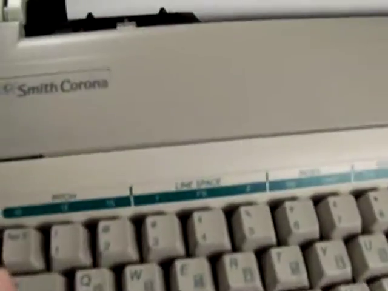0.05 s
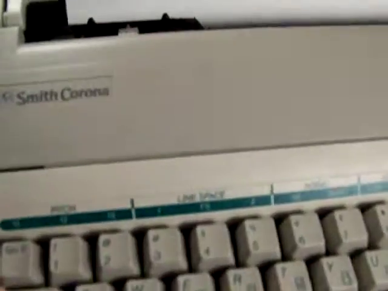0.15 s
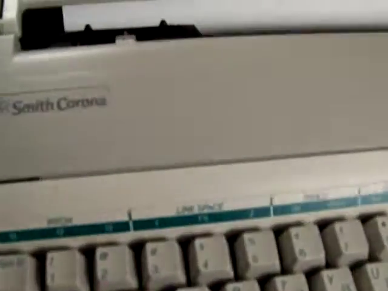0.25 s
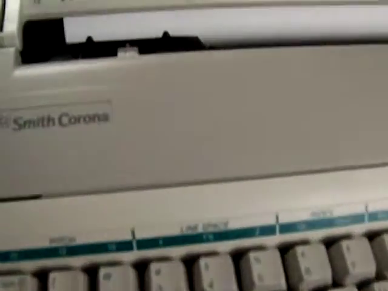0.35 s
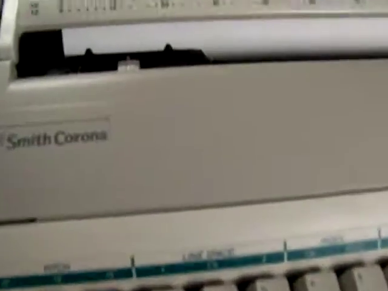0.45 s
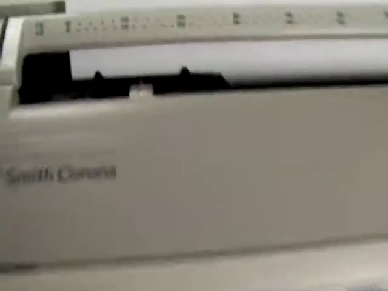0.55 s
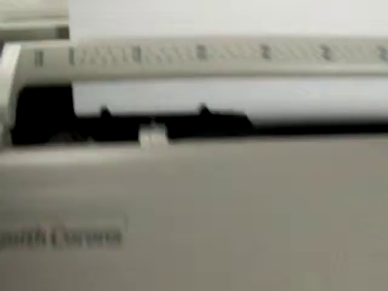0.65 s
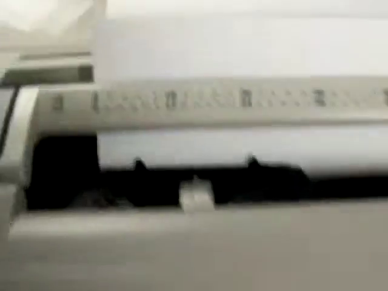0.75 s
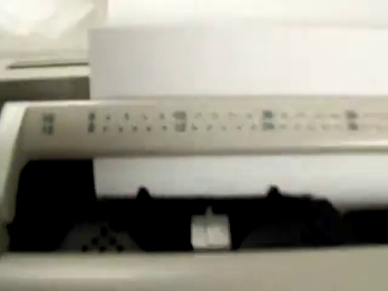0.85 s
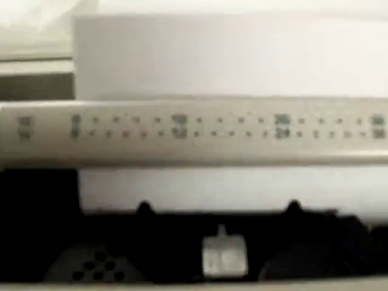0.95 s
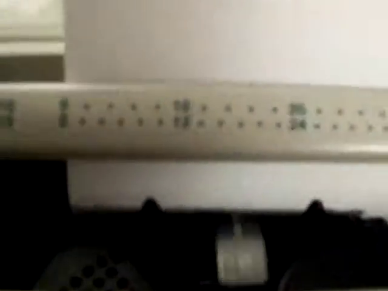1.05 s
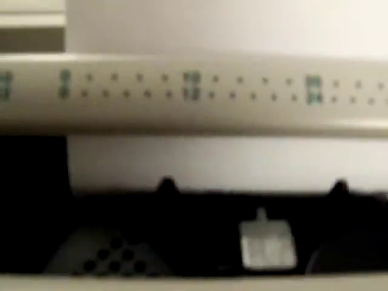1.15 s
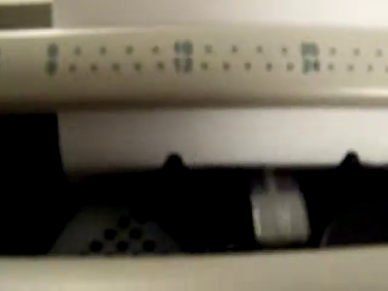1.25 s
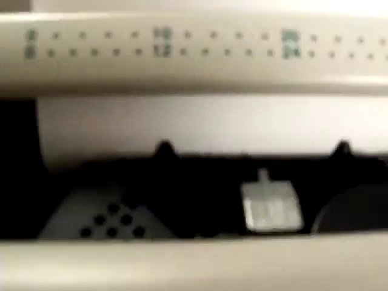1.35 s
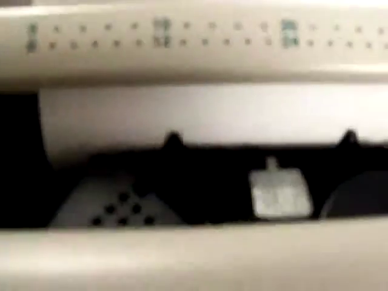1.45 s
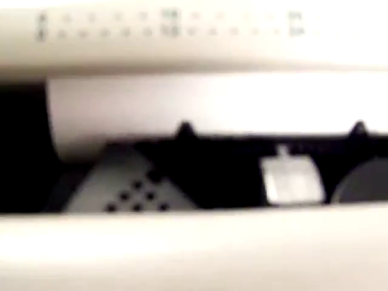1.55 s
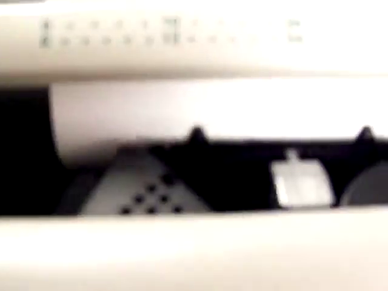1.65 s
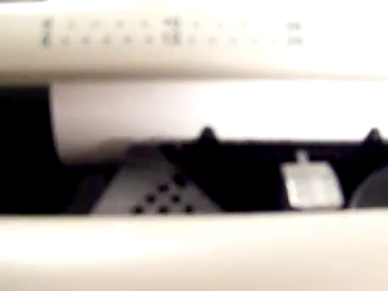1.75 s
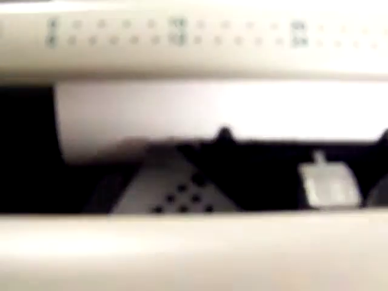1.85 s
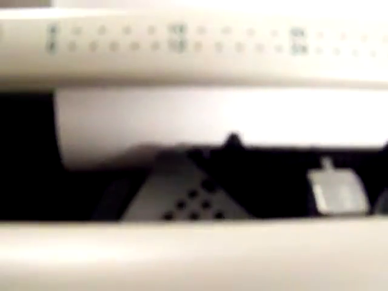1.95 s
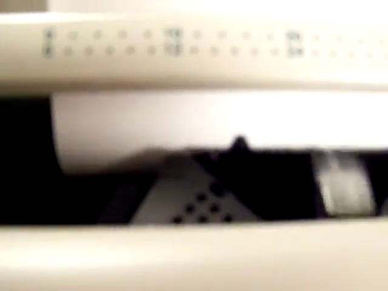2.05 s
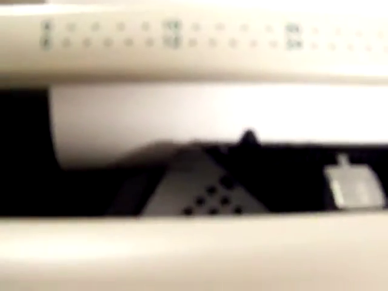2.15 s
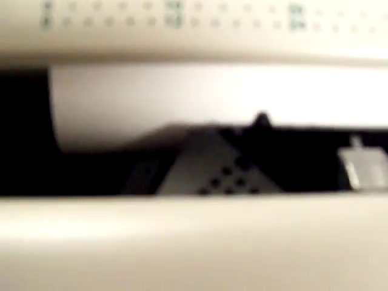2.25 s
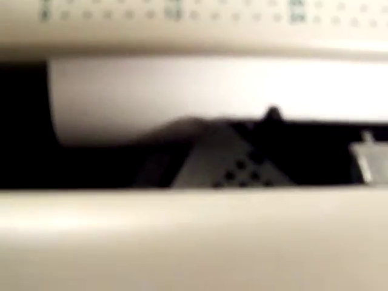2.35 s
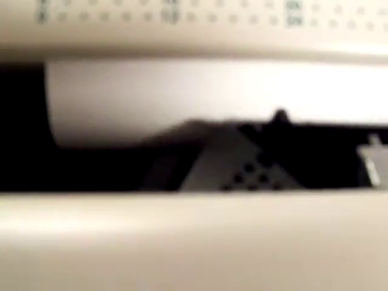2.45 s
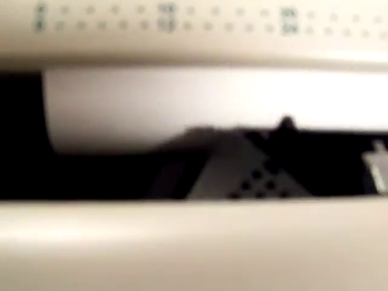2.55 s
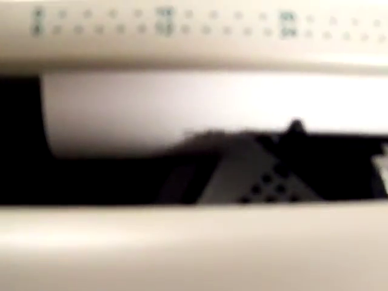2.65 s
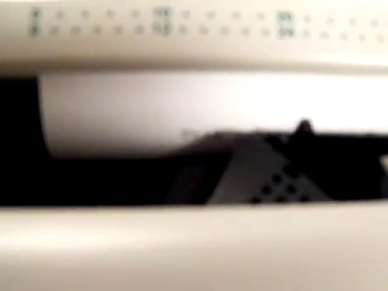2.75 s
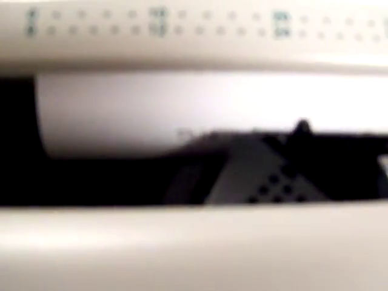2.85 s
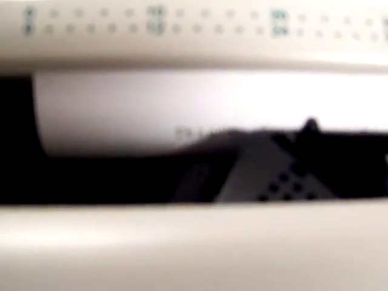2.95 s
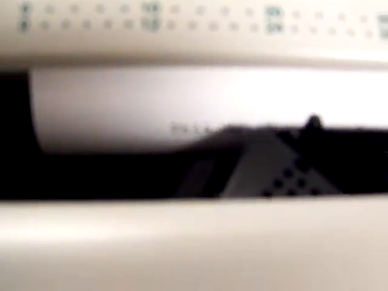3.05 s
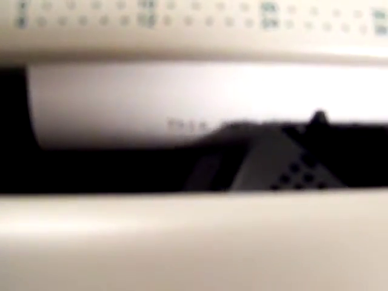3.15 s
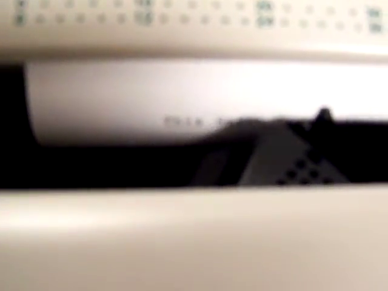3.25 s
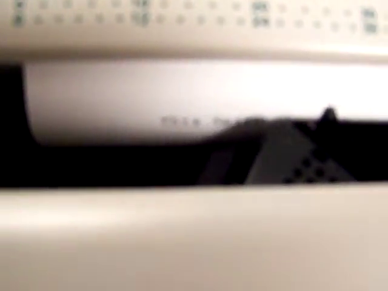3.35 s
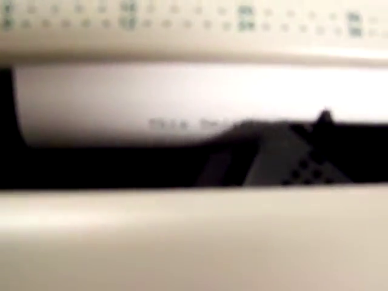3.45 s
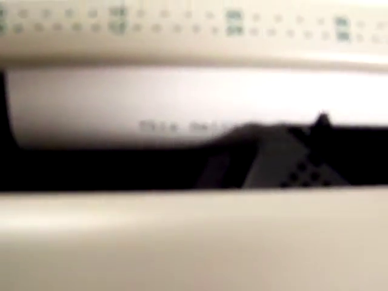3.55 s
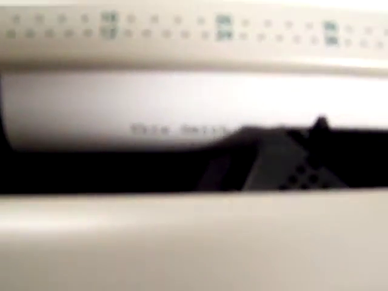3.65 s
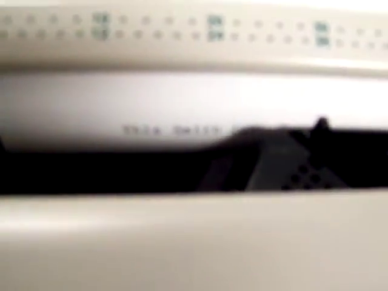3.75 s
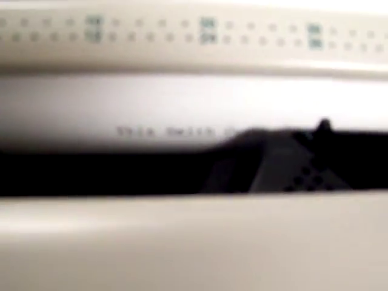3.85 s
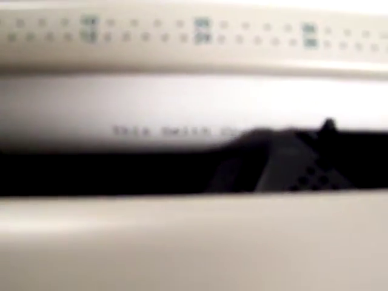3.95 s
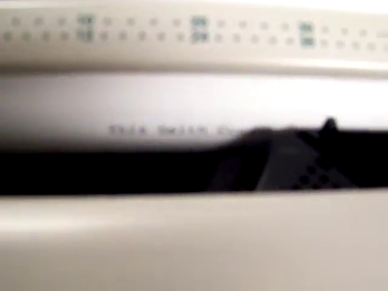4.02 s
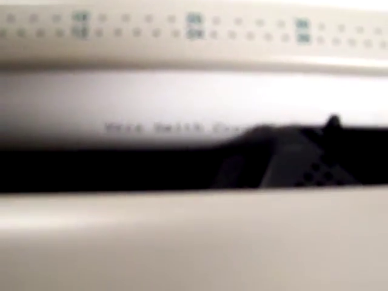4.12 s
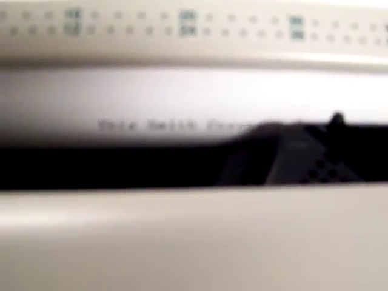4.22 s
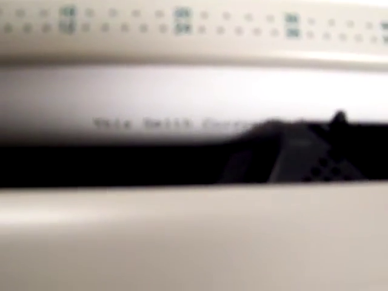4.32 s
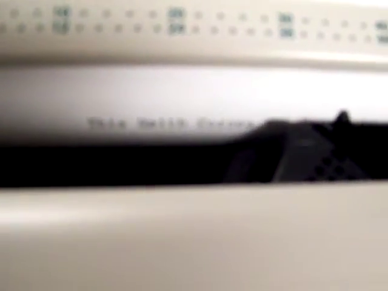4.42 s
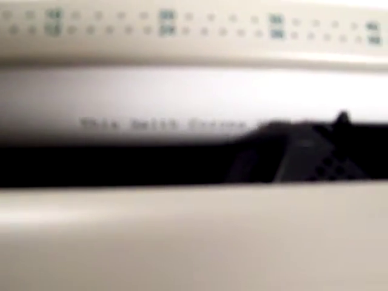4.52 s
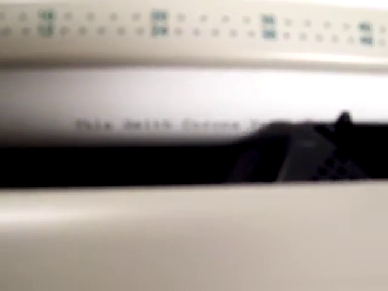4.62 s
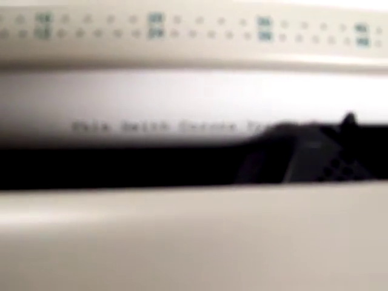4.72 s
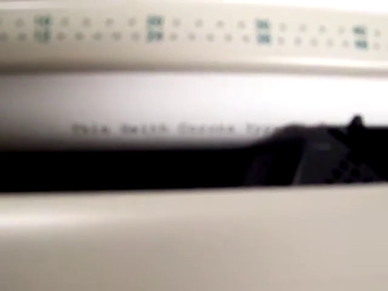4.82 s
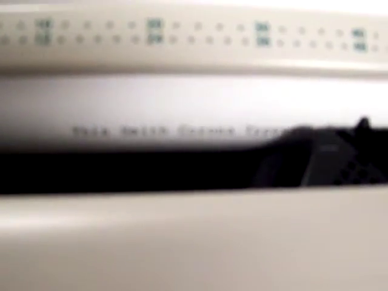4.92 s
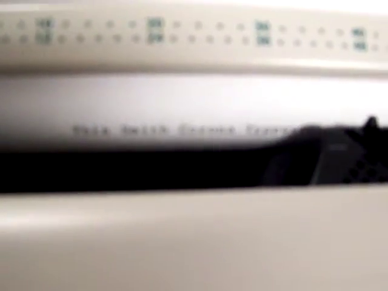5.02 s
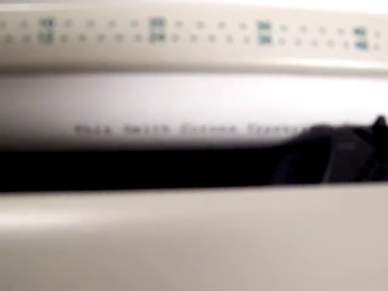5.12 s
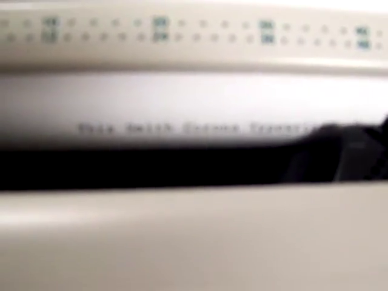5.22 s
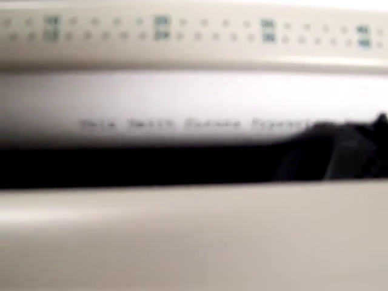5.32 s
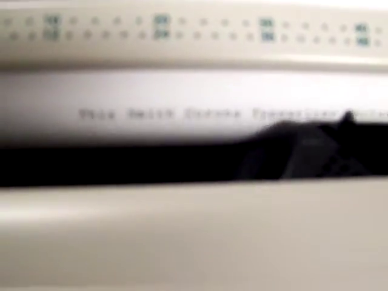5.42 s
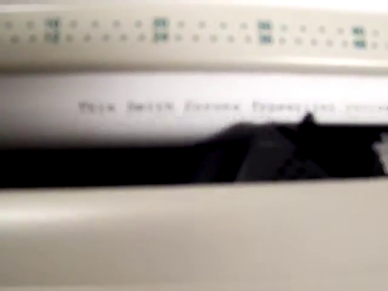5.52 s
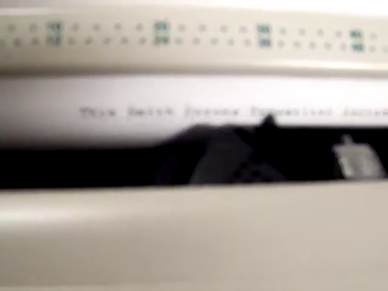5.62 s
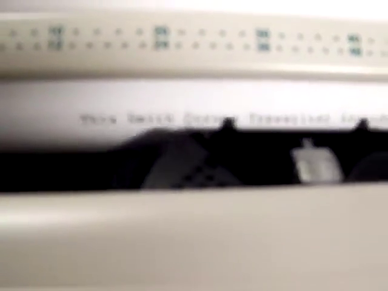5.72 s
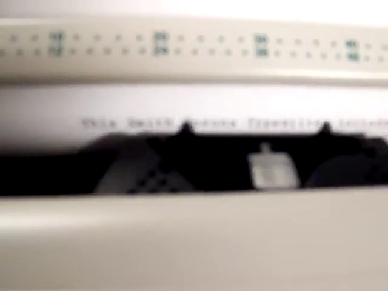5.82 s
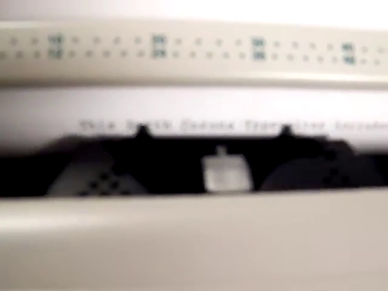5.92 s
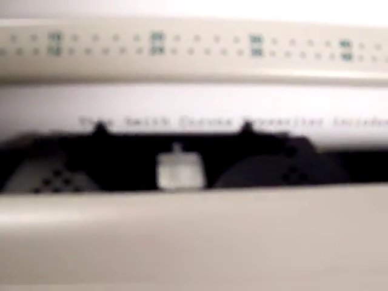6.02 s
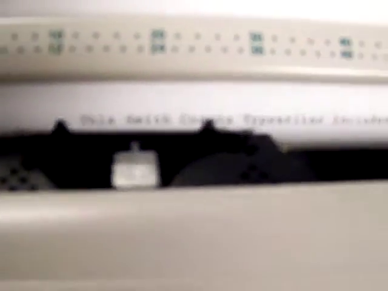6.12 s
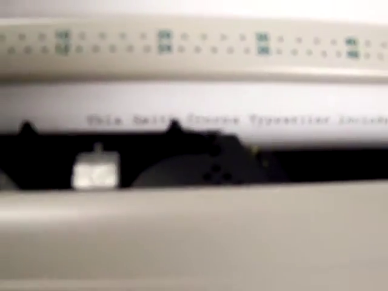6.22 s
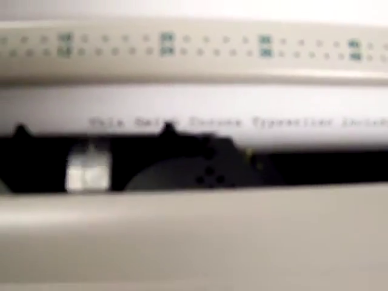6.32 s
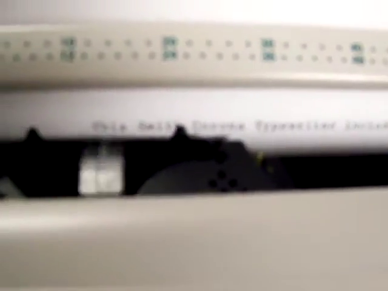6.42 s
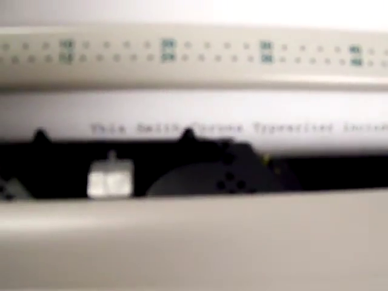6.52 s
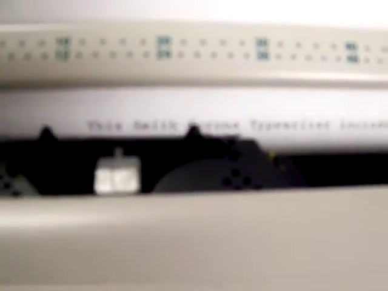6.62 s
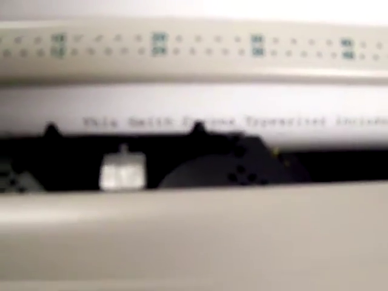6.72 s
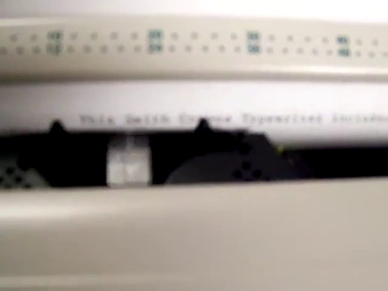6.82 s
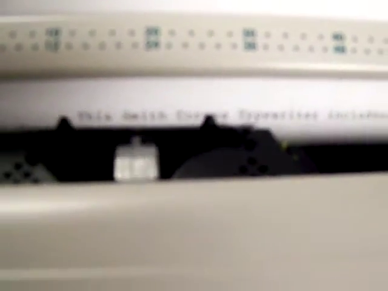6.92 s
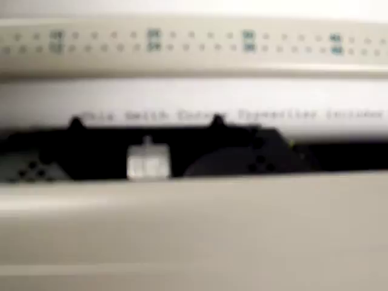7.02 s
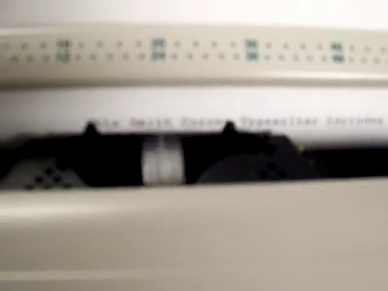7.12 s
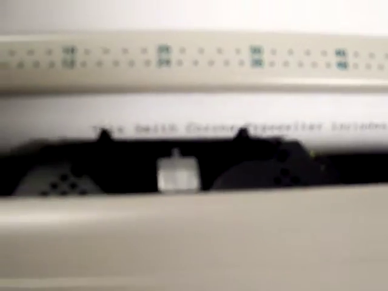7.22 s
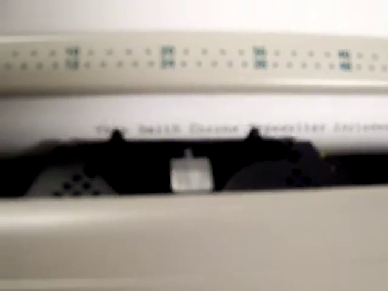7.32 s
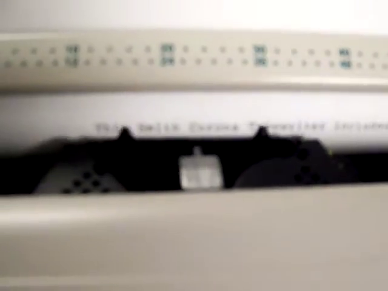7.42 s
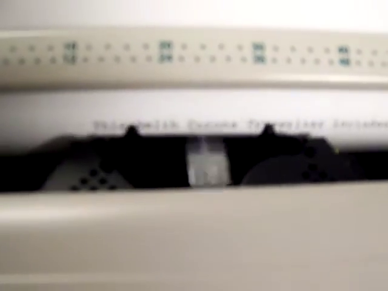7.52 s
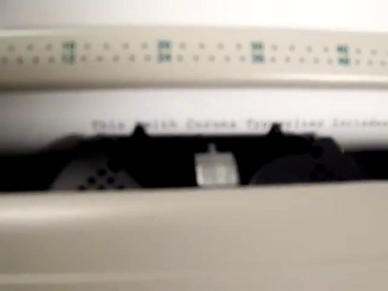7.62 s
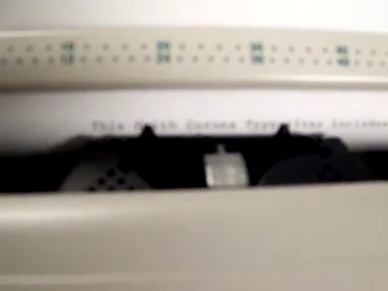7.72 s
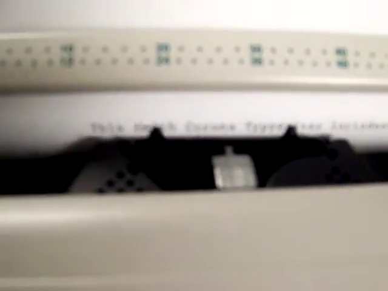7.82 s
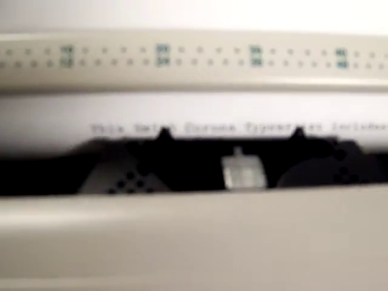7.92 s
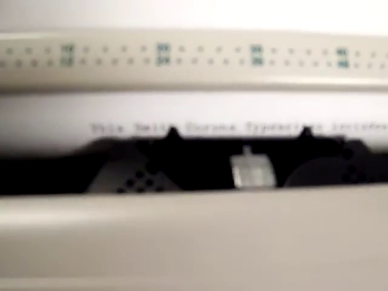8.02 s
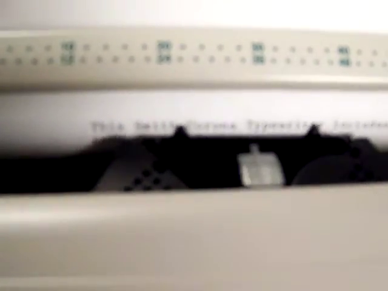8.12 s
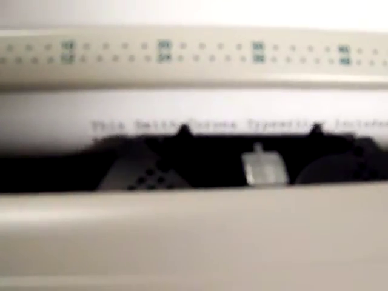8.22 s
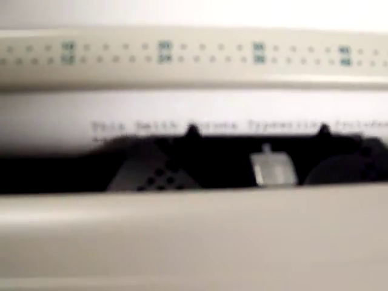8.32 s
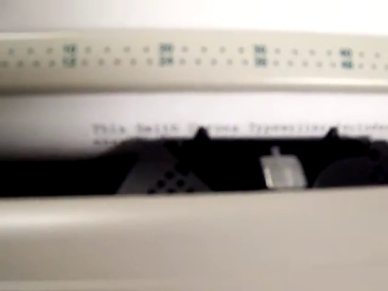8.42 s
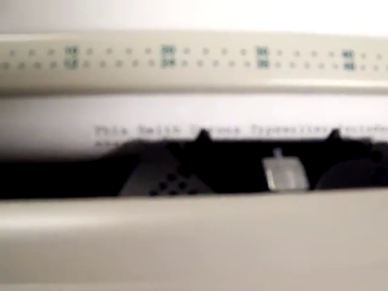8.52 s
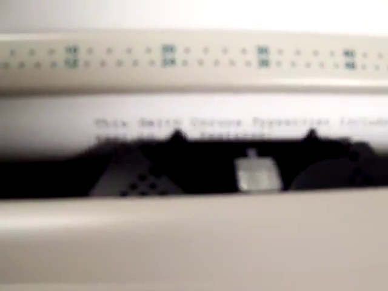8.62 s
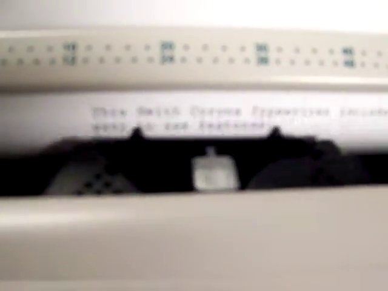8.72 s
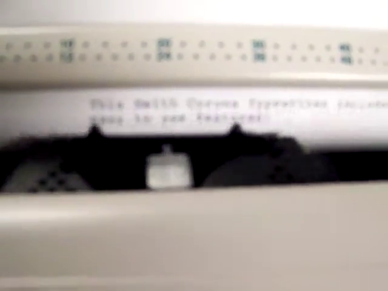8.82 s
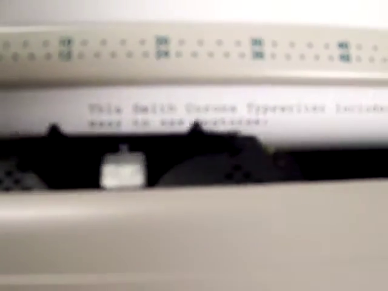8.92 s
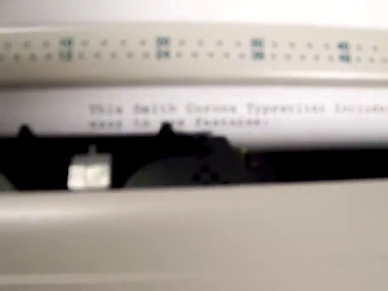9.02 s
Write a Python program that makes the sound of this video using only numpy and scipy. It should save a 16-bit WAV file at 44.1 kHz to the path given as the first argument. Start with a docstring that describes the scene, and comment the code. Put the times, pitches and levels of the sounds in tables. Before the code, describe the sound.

Very close to an electronic typewriter in a quiet room, sharp plastic knocks, gear whir and a brief motor lurch lead into a fast, nearly even run of hard hammer strikes. Each has a crisp crack, rebound and small mechanical clatter. After about five seconds the strikes stop; the motor hums and paper feed clicks. A second run follows, then knocks and motor hum end it. The loudest blows distort.

```python
"""Two microphone ports of a small camera, set very close to an electronic typewriter printing two lines.
From the start there is faint room noise; gears whir, the motor lurches and hums, knocks ring the case.
Then come the letters, each a hammer blow, rebound, carriage step, ribbon latch and print wheel spin.
Between the lines the paper feed ratchets and the resting motor whines; then the second line is typed.
Each port colours shaped noise and ringing modes in its own way, and the loud blows overload."""
import sys
import numpy as np
from scipy import signal
from scipy.fft import rfft, irfft
from scipy.io import wavfile
from scipy.ndimage import uniform_filter1d

SR = 44100
rng = np.random.default_rng(int(sys.argv[2]) if len(sys.argv) > 2 else 0)


def level_to_linear(level):
    """Convert decibel levels to linear amplitude factors, elementwise."""
    exponent = np.asarray(level, float) / 20
    return 10 ** exponent


def log_audio(samples):
    """Write samples as a 16-bit WAV file to the path given in sys.argv[1]."""
    # one column per channel
    frames = np.atleast_2d(samples).T
    # limit to full scale, then quantise
    limited = np.clip(frames, -1, 1)
    pcm = np.round(limited * 32767).astype(np.int16)
    wavfile.write(sys.argv[1], SR, pcm)


N = 399722


def evened(x):
    """Scales a sound to rms 1."""
    return x / np.sqrt(np.mean(x ** 2) + 1e-20)


def add(mix, s, sound):
    """Mixes a sound in from time s, cut off at the end of the mix."""
    part = mix[..., round(s * SR):][..., :sound.shape[-1]]
    part += sound[..., :part.shape[-1]]


def burst(rise, t60):
    """Envelope that swells over rise seconds, then dies by 60 dB in t60 seconds."""
    t = np.arange(-rise, t60, 1 / SR)
    return np.where(t < 0, (1 + t / rise) ** 3, level_to_linear(-60 * t / t60))


def stretch(length, edge):
    """Envelope that holds for a while with soft ends."""
    return signal.windows.tukey(round(length * SR), min(2 * edge / length, 1))


def band_noise(low, high):
    """Noise between two pitches in Hz, rms 1."""
    band = signal.butter(2, [low, high], "band", fs=SR, output="sos")
    return evened(signal.sosfilt(band, rng.standard_normal(N)))


# likeness of the noise at the two ports: (f/Hz, likeness 0 to 1)
PORT_LIKENESS = [(60, 0.89), (200, 0.97), (660, 0.96), (2200, 0.14), (7310, 0.02)]


def coloured(table):
    """Two channels of noise, alike in the bass, each shaped by a level column of the table."""
    hz = np.log(np.fft.rfftfreq(N, 1 / SR) + 1)
    f, *db = np.transpose(table)
    likeness_hz, likeness = np.transpose(PORT_LIKENESS)
    same = np.clip(np.interp(hz, np.log(likeness_hz), likeness), 0, 1)
    left, other = rfft(rng.standard_normal((2, N)))
    pair = np.array([left, same * left + np.sqrt(1 - same ** 2) * other])
    # a table with one level column serves both sides
    shape = level_to_linear([np.interp(hz, np.log(f), column) for column in (db[0], db[-1])])
    return evened(irfft(pair * shape, N))


# the room around the machine: (f/Hz, relative level/dB)
ROOM = [(20, -20), (60, -4), (150, -7), (400, -13), (1000, -18), (2000, -23), (4000, -17), (5500, -23),
        (7500, -22), (9000, -45)]


def room():
    """Steady faint noise, falling towards the treble."""
    return level_to_linear(-46) * coloured(ROOM)  # dB rms


# the case heard at each microphone port: (f/Hz, left relative level/dB, right relative level/dB)
PORTS = [(58, -13, -6.5), (160, -47, -26.5), (440, -21.5, -15), (1130, -26, -20.5), (1860, -21, -12.5),
         (2750, -18.5, -5.5), (3090, -14, 4), (3700, -17.5, 0.5), (4500, -12.5, 4.5), (5630, -14.5, -8.5),
         (6430, -7.5, -16), (6600, -6, -22.5), (8960, 1, -10), (8600, 0, -64)]


def case_noise():
    """Noise with the colour of the case at each port, the raw sound of rattles and knocks."""
    return coloured(PORTS)


def chatter():
    """Gear teeth: the whir comes in uneven grains, about 350 a second, each with a short tail."""
    teeth = level_to_linear(4.7 * np.minimum(rng.exponential(1, N), 2.5)) * (rng.random(N) < 350 / SR)
    return evened(1.02 + signal.oaconvolve(teeth, burst(0.00059, 0.033))[:N])


# gears run on where no letter is struck: (start t/s, length t/s, relative level/dB)
WHIRS = [(0.045, .07, -29), (0.129, .14, -23.5), (.27, 0.046, -19), (0.369, 0.035, -13.5),
         (0.4, .065, -28.5), (0.48, 0.063, -37), (0.584, .045, -14.5), (1.078, 0.13, -23.5),
         (1.28, 0.046, -19.5), (1.759, 0.093, -16.5), (2.516, 0.082, -15), (2.693, 0.048, -25),
         (3.719, 0.081, -17.5), (4.638, 0.083, -24.5), (6.658, 0.056, -18), (6.952, 0.082, -20),
         (7.384, 0.061, -15.5), (8.34, 0.065, -23), (8.47, 0.086, -27), (8.77, 0.093, -30),
         (8.858, 0.097, -39), (9.011, .055, -33)]


def whirs(case, teeth):
    """Gear grains drive the case and make the guide rail sing."""
    idle = np.zeros(N)
    for s, length, db in WHIRS:
        add(idle, s, level_to_linear(db) * stretch(length, 0.0054))
    singing = signal.lfilter(*signal.iirpeak(4640, 14, SR), case)
    rail = evened(case + 0.23 * singing)
    return rail * idle * teeth


MOTOR_SIDES = level_to_linear([[-1.1], [1.1]])  # the motor is a little louder at the right port, dB

# the case lurches as the motor starts or stops: (peak t/s, relative level/dB, f/Hz)
JOLTS = [(0.085, -33, 91), (0.386, -33, 203), (5.256, -36, 175), (5.515, -33, 203.5), (5.657, -29.5, 98),
         (6.184, -34, 100), (8.508, -29.5, 177), (8.77, -29.5, 199), (8.909, -27.5, 105), (8.948, -36, 108),
         (9.03, -30, 105)]


def jolts():
    """A low tone and loose rumble swell and die together."""
    out = np.zeros(N)
    rise = 0.03  # s
    shape = burst(rise, 0.12)
    t = np.arange(len(shape)) / SR
    rumble = band_noise(85, 220)
    for s, db, hz in JOLTS:
        loose = rumble[round(s * SR / 2):][:len(shape)]
        lurch = 1.08 * np.sin(2 * np.pi * hz * t) + 0.65 * loose
        add(out, s - rise, level_to_linear(db) * shape * lurch)
    return out * MOTOR_SIDES


# colour of the drone in case and desk: (f/Hz, relative level/dB)
DRONE = [(20, -15), (70, 2.5), (150, -5.5), (400, -6), (800, -10), (1500, -15), (2500, -15), (4000, -21),
         (8500, -43)]


def drone():
    """Low and middle noise of case and desk swells with every blow or knock and dies slowly."""
    power = np.zeros(N)
    rise = 0.0065  # s
    shape = burst(rise, 0.51)
    hits = [row[:2] for row in STRIKES] + [(row[0], row[1] - 7) for row in KNOCKS]
    for s, db in hits:
        add(power, s - rise / 2, (level_to_linear(db) * shape) ** 2)
    return level_to_linear(-23.5) * np.sqrt(power) * coloured(DRONE)


def struck(case, dull, s, db, hz, t60, thud_db, ring, q):
    """Case noise rings at the pitch of the part that was hit, over a dull thud; returns start and sound."""
    shape = burst(.001, t60)
    noise = case[:, round(s * SR):][:, :len(shape)]
    length = noise.shape[1]
    lifted = noise + ring * signal.lfilter(*signal.iirpeak(hz, q, SR), noise)
    thud = level_to_linear(thud_db) * dull[round(s * SR):][:length]
    return s - .001, (level_to_linear(db - 4) * evened(lifted) + thud) * shape[:length]


# knocks of keys and levers: (peak t/s, relative level/dB, centre f/Hz, t60/s, thud level/dB)
KNOCKS = [(0.0623, -4.5, 3750, 0.022, -30), (0.0747, 1.5, 4000, 0.081, -26), (.1068, -7, 4460, 0.057, -32),
          (.2374, -6, 6100, 0.026, -32), (0.267, -9, 3940, 0.026, -31), (0.29, -5, 3990, 0.032, -31),
          (.3096, -5, 4460, 0.048, -29), (0.3128, -2.5, 4600, 0.036, -32), (0.329, 0.5, 3780, 0.073, -31),
          (0.3412, -2.5, 3630, 0.033, -27), (0.374, -15, 3700, 0.072, -38), (.3904, -14, 4930, .034, -41),
          (0.4632, -6, 4830, 0.046, -27), (0.5038, -23, 4200, 0.098, -32), (.547, -3.5, 4000, 0.039, -32),
          (.56, -13, 3380, 0.072, -38), (1.0827, -3.5, 4100, 0.031, -40), (1.126, -2, 4200, 0.046, -38),
          (1.2246, -12, 4030, 0.042, -40), (1.287, -8, 4150, 0.032, -48), (1.808, -2, 3580, 0.052, -32),
          (4.6448, -8, 4330, 0.026, -43), (4.6617, -4.5, 4070, 0.02, -33), (5.2244, -13, 4080, 0.03, -37),
          (5.45, -23, 4700, 0.048, -37), (5.5045, -8, 4900, 0.099, -35), (5.5166, -14.5, 4330, 0.056, -52),
          (5.5375, -14, 4700, 0.035, -51), (5.5895, -19, 4540, 0.046, -36), (6.174, -10.5, 4540, .045, -42),
          (6.1787, -10, 4640, 0.062, -41), (6.193, -13, 4610, 0.045, -36), (6.71, -9.5, 4470, 0.075, -38),
          (8.336, -7, 4700, 0.094, -37), (8.706, -14.5, 4300, 0.032, -34), (8.754, -5, 4500, 0.017, -33),
          (8.757, -5, 4440, 0.11, -37), (8.77, -14, 4530, .04, -45), (8.8447, -22, 4220, 0.032, -30),
          (8.8865, -21, 4240, 0.059, -36), (8.907, -20, 4400, 0.03, -36), (8.948, -14, 3130, 0.06, -29.5),
          (9.01, -18.5, 4260, .043, -36)]


def knocks(case):
    """Keys and levers hit the case: short broad rings over thuds."""
    out = np.zeros((2, N))
    dull = band_noise(250, 1400)
    for row in KNOCKS:
        add(out, *struck(case, dull, *row, ring=1.63, q=12))
    return out


# motor runs: (start t/s, length t/s, third harmonic level/dB, other harmonics relative level/dB,
# rail hiss level/dB)
RUNS = [(.125, 0.19, -32, -58, -34.5), (.37, 0.114, -32, -48, -36), (.5, 0.12, -54, -53, -39.5),
        (5.251, 0.23, -36, -52, -36), (5.48, 0.13, -32.5, -52, -34), (5.584, 0.2, -52, -49, -40),
        (5.773, 0.41, -43, -47.5, -42), (8.505, .26, -42, -51.5, -38.5), (8.76, 0.089, -36.5, -46, -44),
        (8.836, 0.13, -46, -46, -45), (9.008, 0.055, -43, -57, -43)]
# overtones of the step tone: (multiple of the step f, level/dB beside the second)
OVERTONES = [(1, -1), (2, 0), (5, -7), (6, -8), (8, -12), (10, -16)]
# colour of the hiss of the rail: (f/Hz, relative level/dB)
RAIL = [(100, -5), (500, -5), (1100, -21), (2300, -17), (3250, -11), (3900, -12), (4650, -3), (5500, -24),
        (6200, -16.5), (7200, -9), (8200, -19)]


def motor_runs():
    """The carriage motor's steps sound as steady harmonics, the third one wavering, with rail hiss."""
    tone, hiss, t = np.zeros(N), np.zeros(N), np.arange(N) / SR
    turn = 2 * np.pi * 134.2 * t  # step rate, Hz
    others = sum(level_to_linear(db) * np.sin(k * turn + k) for k, db in OVERTONES)
    waver = evened(uniform_filter1d(rng.standard_normal(N), round(.03 * SR)))
    third = np.sin(3 * turn) * level_to_linear(1 * waver)  # wavers by 1 dB rms
    for s, length, third_db, others_db, hiss_db in RUNS:
        hold = stretch(length, 0.0095)
        span = slice(round(s * SR), round(s * SR) + len(hold))
        tones = level_to_linear(third_db) * third[span] + level_to_linear(others_db) * others[span]
        fade_in = np.minimum(t[:len(tones)] / 0.032, 1)
        add(tone, s, np.sqrt(2) * tones * hold[:len(tones)] * fade_in)
        add(hiss, s, level_to_linear(hiss_db) * hold)
    return tone * MOTOR_SIDES + hiss * coloured(RAIL)


# one row a letter: (blow t/s, then relative levels/dB of blow, rebound, carriage step, ribbon latch)
STRIKES = [(0.6327, -8.5, -7.5, -21, -5), (0.7664, -8, -10, -19, -7.5), (.871, -8, -11, -18, -9),
           (0.9778, -6.5, -5.5, -37, -8.5), (1.177, -4, -10, -15.5, -10), (1.338, -3.5, -8, -16, -7.5),
           (1.4632, -7.5, -10, -17, -6), (1.5624, -7, -5, -19, -9), (1.6614, -7.5, -8.5, -37, -7),
           (1.8582, -4.5, -8.5, -17, -9.5), (1.983, -7, -11, -14.5, -8), (2.0995, -7.5, -6.5, -15.5, -6.5),
           (2.2157, -6.5, -8.5, -17.5, -7), (2.315, -6.5, -6, -11.5, -9.5), (2.4194, -6.5, -8, -23, -6),
           (2.6067, -5.5, -7, -23, -7), (2.7498, -5.5, -7.5, -12.5, -8), (2.8494, -6.5, -10.5, -12, -6),
           (2.968, -6.5, -5.5, -18, -5.5), (3.079, -6, -7, -13, -7), (3.1825, -7.5, -5.5, -17, -6),
           (3.3018, -8.5, -8.5, -16, -8), (3.3997, -6, -9, -17, -7), (3.4998, -7, -6, -26, -5),
           (3.6208, -7.5, -5, -26, -2), (3.8083, -6, -7, -19, -8), (3.9072, -6.5, -6, -17.5, -7),
           (4.0143, -6.5, -4.5, -20, -5), (4.113, -7.5, -4, -14, -6), (4.2309, -5, -6.5, -20.5, -6.5),
           (4.3315, -4.5, -11, -18, -7.5), (4.4377, -6, -4, -19, -6.5), (4.5425, -5, -6.5, -34, -6.5),
           (4.7305, -5, -5.5, -24, -9.5), (4.8285, -6.5, -4.5, -22, -5), (4.9286, -5.5, -8, -13.5, -8),
           (5.0322, -5.5, -4, -19, -6), (5.1377, -6, -6, -46, -8), (6.2553, -7.5, -11.5, -21, -11.5),
           (6.3543, -6, -9.5, -17.5, -9), (6.468, -7, -6.5, -18, -8.5), (6.5669, -7.5, -5.5, -28, -6),
           (6.754, -8.5, -7, -16, -7.5), (6.8581, -6, -3.5, -28, -9), (7.0455, -6, -7, -17, -9),
           (7.1619, -7, -8.5, -16, -7), (7.265, -7, -9, -19, -7.5), (7.4529, -8, -5, -13, -8.5),
           (7.572, -8.5, -6.5, -17.5, -9), (7.6707, -8, -5, -11, -9.5), (7.7781, -8.5, -9, -13.5, -9),
           (7.8883, -7.5, -6, -16, -7), (7.998, -7.5, -7, -15.5, -7), (8.1197, -7, -10, -23, -4),
           (8.2234, -7, -6, -20, -7.5), (8.3881, -8, -8.5, -51, -9.5)]
# whir of the print wheel by the wait for the next letter: (t/s to the next blow, relative level/dB)
SPIN = [(.099, -32), (.105, -24.5), (.12, -24.5), (.15, -29.5), (.18, -31)]


def print_cycles(case, teeth):
    """Each letter's moving parts shake the case: sharp bursts, and gear work in grains."""
    sharp, gears = np.zeros((2, N)), np.zeros(N)
    ends = [row[0] for row in STRIKES[1:]] + [N / SR]
    for (s, blow, rebound, step, latch), end in zip(STRIKES, ends):
        add(sharp, s - .0045, level_to_linear(-11.5) * burst(0.00085, 0.028))  # the solenoid fires
        add(sharp, s - .0005, level_to_linear(blow + 8) * burst(.0005, .02))  # the hammer lands
        # pairs of levels are left and right
        clatter = level_to_linear(blow + np.array([[7.1], [4.1]]))
        add(sharp, s, clatter * burst(0.0034, 0.055))  # the ribbon carrier clatters
        add(gears, s, level_to_linear(blow + 5) * burst(0.0029, .13))  # the wheel spokes chatter on
        add(sharp, s + 0.02327, level_to_linear(rebound + np.array([[4.1], [5.1]])) * burst(0.0073, 0.022))
        add(gears, s + 0.041, level_to_linear(step) * stretch(0.034, 0.0045))  # the carriage steps
        add(sharp, s + .0695, level_to_linear(latch + np.array([[9.1], [4.1]])) * burst(0.00444, 0.038))
        spin = level_to_linear(np.interp(end - s, *np.transpose(SPIN)))
        spin_length = min(end - s - .005, .14) - .08
        add(sharp, s + 0.0814, spin * stretch(spin_length, 0.0029))  # the wheel turns smoothly
    return case * sharp + case * gears * teeth


# slow changes along the typing: (t/s, hammer ring relative level/dB, right port push relative level/dB)
BLOW_CHANGES = [(.6, 3, -20), (1, 1.5, -15), (1.2, 6.5, -4.5), (1.55, 3.5, -13.5), (1.87, 6.5, -5.5),
                (2.3, 2.5, -11.5), (3.1, 2.5, -18), (3.6, 4, -18), (4.2, -3, -22.5), (5.2, -4, -26.5),
                (6.2, 0, -27), (6.7, 2.5, -19), (7.1, -2, -18.5), (7.6, 3, -11.5), (8.4, 2.5, -21)]


def air_push():
    """Each hard blow pushes air into the right port: a slow swing one way, then back."""
    out, t = np.zeros((2, N)), np.arange(0, .15, 1 / SR)
    at, _, offset_db = np.transpose(BLOW_CHANGES)
    one_way = np.minimum(t / .003, 1) * np.cos(np.pi / 2 * np.minimum(t / .032, 1))
    back = .45 * np.sin(np.pi * np.clip((t - .02) / .085, 0, 1) ** .6)
    for s, blow, *_ in STRIKES:
        # the push grows by 2.2 dB for each dB of blow
        db = 2.2 * (blow + 7) + np.interp(s, at, offset_db) - 4.5
        add(out[1], s - .001, level_to_linear(db) * (one_way - back))
    return out


# modes of hammer, platen and case: (mean f/Hz, left relative level/dB, right relative level/dB, t60/s)
HAMMER = [(81.6, -24, -20.5, 0.12), (195, -23, -20, 0.074), (402, -13, -15.5, 0.036),
          (570, -16.5, -29.5, 0.029), (1472, -13.5, -47, 0.026), (3077, -67, -3.5, 0.054),
          (3308.4, 2.5, 14, 0.021), (3580, 6, 1, 0.014), (4200, -28, 0.5, 0.023), (4690, -5.5, 2.5, 0.02),
          (5910, 5.5, -40, 0.011), (7000, -8.5, -4.5, 0.026), (7740, -11.5, 6.5, 0.011)]


def hammer_ring():
    """Blows ring the same modes, slightly detuned at random from blow to blow; rebounds ring them softly."""
    out, t = np.zeros((2, N)), np.arange(0, .15, 1 / SR)
    hz, left, right, t60 = np.transpose(HAMMER)[:, :, None]
    at, ring_db, _ = np.transpose(BLOW_CHANGES)
    # below 1 kHz the case rings much alike for every blow; above, the ring varies more by chance
    spread_db = np.where(hz < 1000, 1.2, 3.5)
    swell = np.minimum(t / 0.0052, 1) ** 2 * level_to_linear(-60 * t / 0.11)
    chances = rng.standard_normal((len(STRIKES), 3, len(hz), 1))
    for (s, blow, rebound, *_), (loudness, detune, phase) in zip(STRIKES, chances):
        db = np.array([left, right]) + spread_db * loudness - 60 * t / t60
        modes = np.sin(2 * np.pi * hz * (1 + 0.0099 * detune) * t + 0.78 * phase)
        ring = (level_to_linear(db) * modes).sum(1)
        ring *= np.minimum(t / 0.00074, 1) * level_to_linear(np.interp(s, at, ring_db))
        add(out, s - .0004, level_to_linear(blow + 3.5) * ring)
        add(out, s + .027, level_to_linear(rebound + 1.5) * ring * swell)
    return out


# teeth of the paper feed drop: (t/s)
RATCHET_TEETH = [5.6366, 5.657, 5.687, 5.7184, 5.749, 5.785, 5.8213, 5.86]


def ratchet(case):
    """Each tooth of the paper feed clicks at one pitch, just after its pawl lifts more quietly."""
    out = np.zeros((2, N))
    dull = band_noise(250, 1400)
    for s in RATCHET_TEETH:
        for at, db in ((s, -18), (s - 0.0062, -28)):  # tooth, pawl
            add(out, *struck(case, dull, at, db, hz=4640, t60=0.034, thud_db=-42.5, ring=6, q=22))
    return out


# the motor holds still under current: (start t/s, length t/s)
RESTS = [(6.2, 0.081), (8.955, .055)]
# tones of the motor driver at rest: (f/Hz, rms level/dB between the two sides)
WHINE = [(2519, -57), (4527, -56), (5523, -59)]


def resting_whine():
    """The driver of the resting motor whines in faint steady tones."""
    out, t = np.zeros(N), np.arange(N) / SR
    whine = sum(np.sqrt(2) * level_to_linear(db) * np.sin(2 * np.pi * hz * t) for hz, db in WHINE)
    for s, length in RESTS:
        hold = stretch(length, .005)
        add(out, s, hold * whine[:len(hold)])
    return out * MOTOR_SIDES


def scene():
    """All parts at the two ports; rattles and knocks share one case noise."""
    case, teeth = case_noise(), chatter()
    moving = room() + whirs(case, teeth) + jolts() + drone() + knocks(case) + motor_runs()
    printing = print_cycles(case, teeth) + air_push() + hammer_ring()
    return moving + printing + ratchet(case) + resting_whine()


def low_pass(x):
    """Removes everything above the highest recorded frequency."""
    return signal.sosfilt(signal.butter(12, 20000, fs=SR, output="sos"), x)


def record(dry):
    """Sampled at 16 kHz, where it clips; at full rate the overshoot between samples clips again."""
    up, down = 160, 441
    low = np.clip(signal.resample_poly(dry, up, down, axis=1, window=("kaiser", 9)), -1, 1)
    full = signal.resample_poly(low, down, up, axis=1)[:, :N]
    lowpass = signal.firwin(255, 7900, window=("kaiser", 9), fs=SR)
    smooth = signal.oaconvolve(full, lowpass[None], "same")
    mix = np.clip(level_to_linear(.5) * smooth, -1, 1)
    return low_pass(mix)


dry = scene()
out = record(dry)
log_audio(out)
```